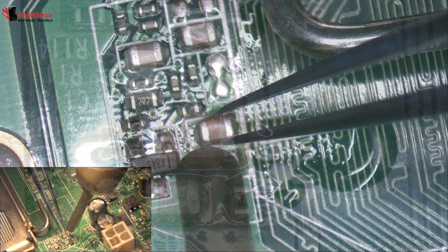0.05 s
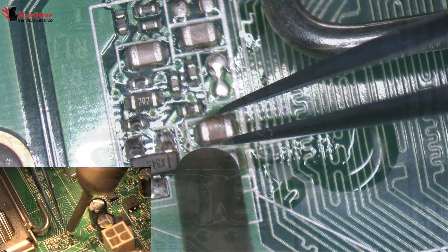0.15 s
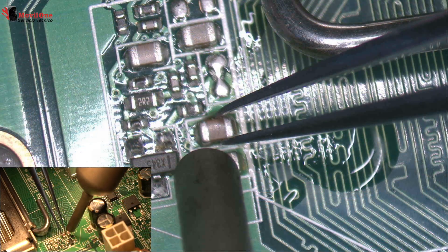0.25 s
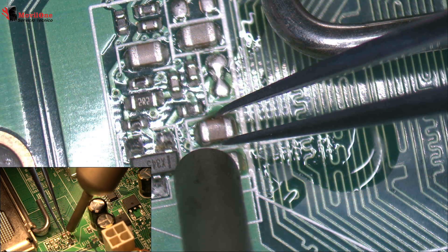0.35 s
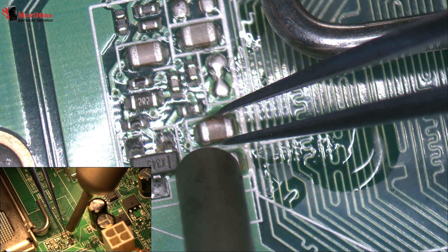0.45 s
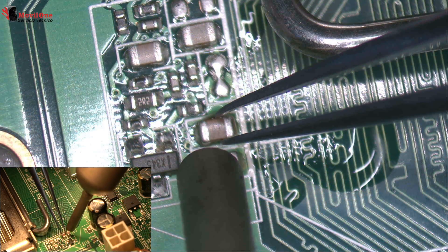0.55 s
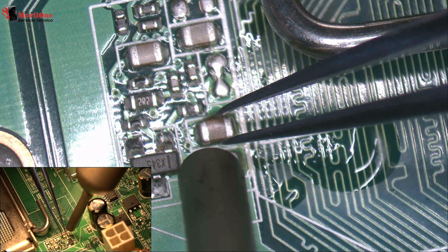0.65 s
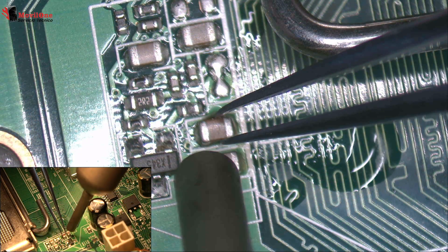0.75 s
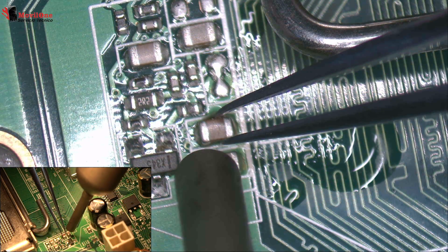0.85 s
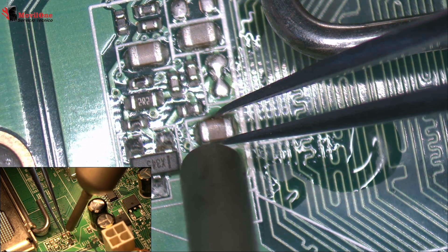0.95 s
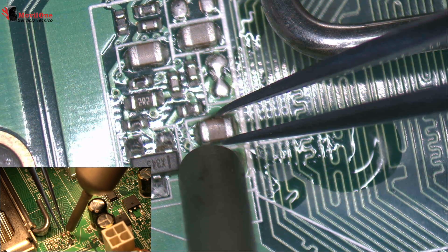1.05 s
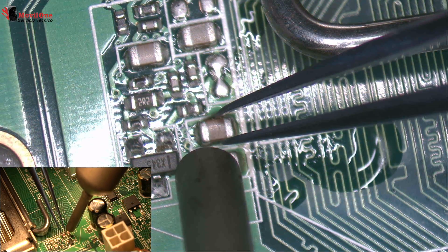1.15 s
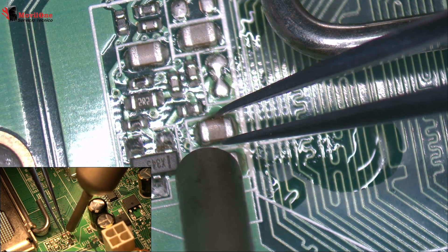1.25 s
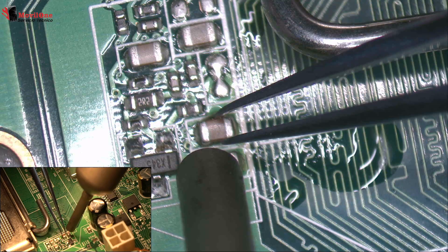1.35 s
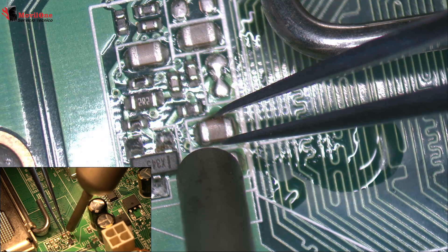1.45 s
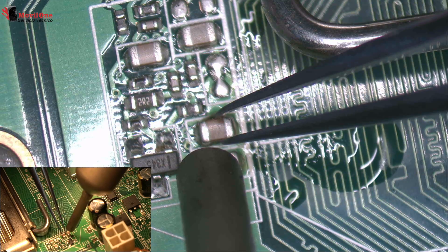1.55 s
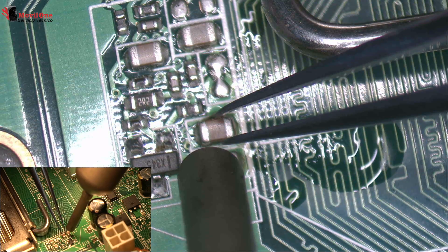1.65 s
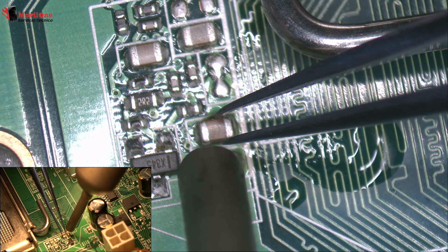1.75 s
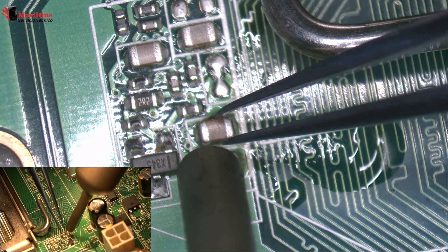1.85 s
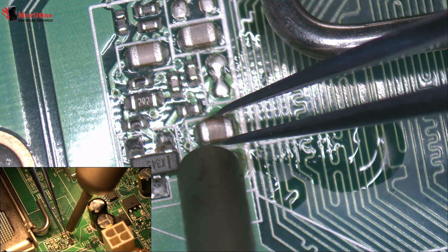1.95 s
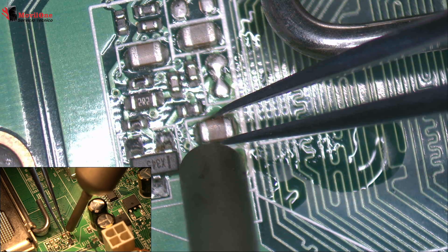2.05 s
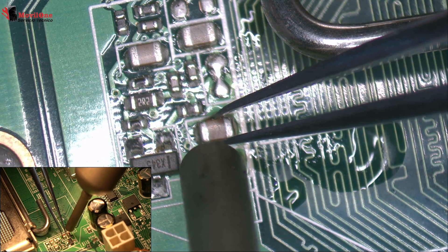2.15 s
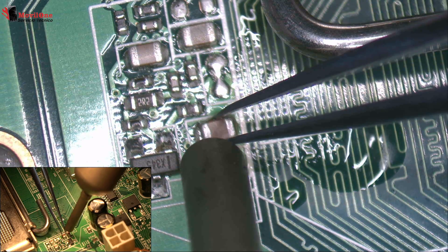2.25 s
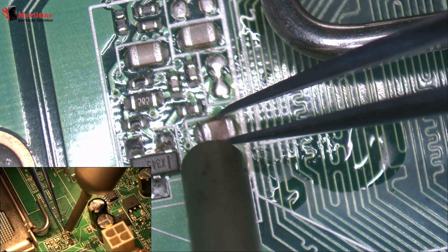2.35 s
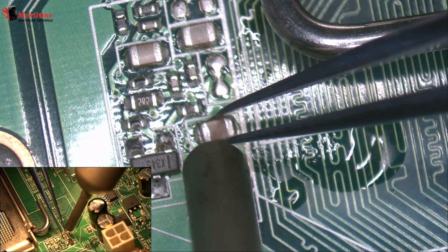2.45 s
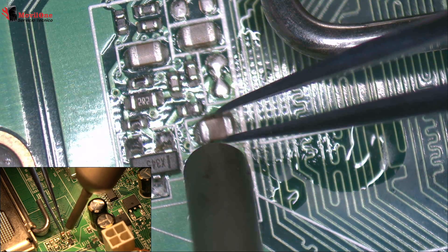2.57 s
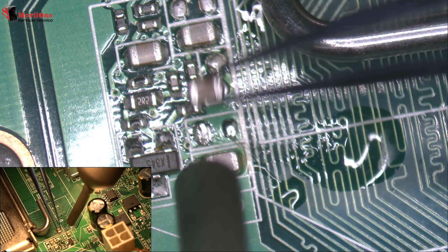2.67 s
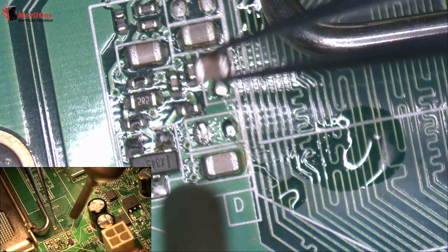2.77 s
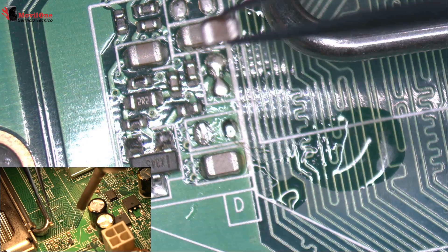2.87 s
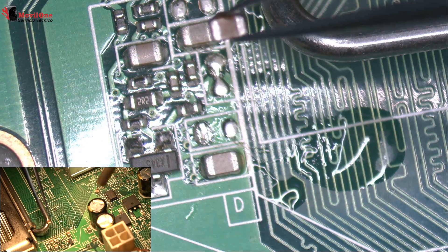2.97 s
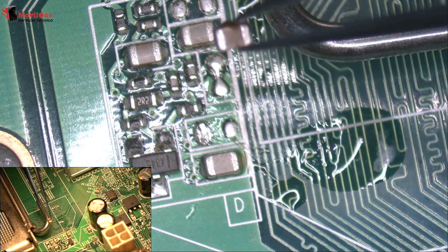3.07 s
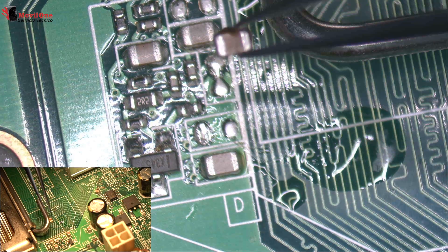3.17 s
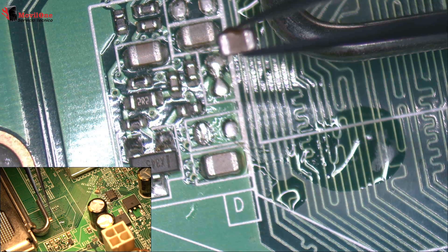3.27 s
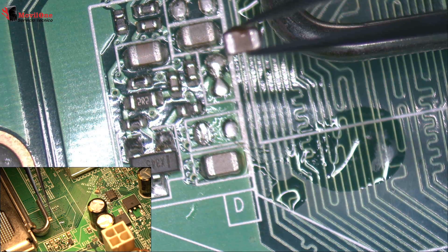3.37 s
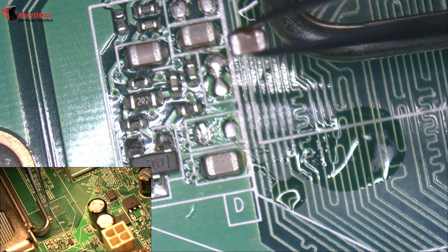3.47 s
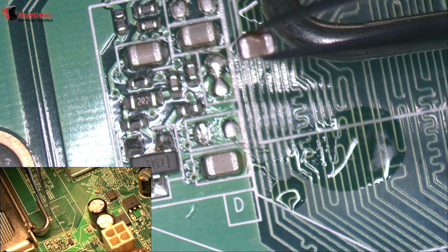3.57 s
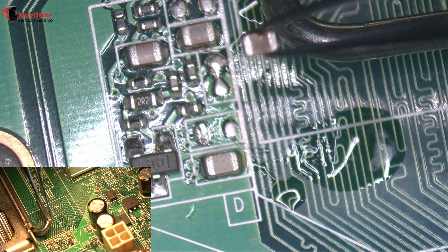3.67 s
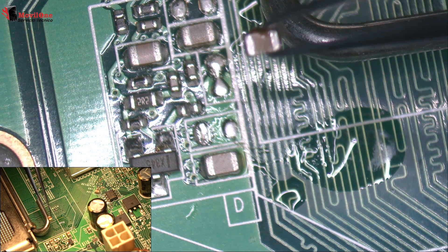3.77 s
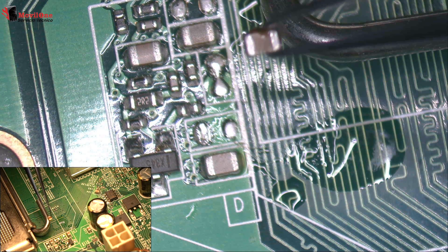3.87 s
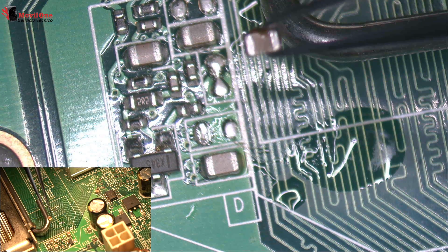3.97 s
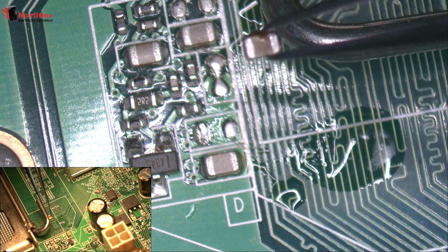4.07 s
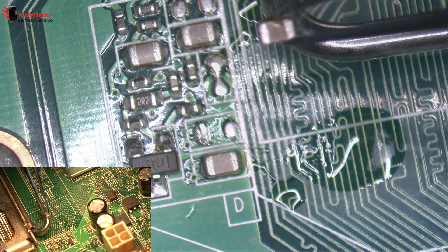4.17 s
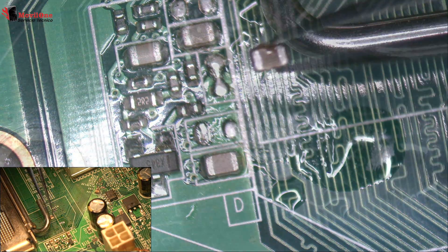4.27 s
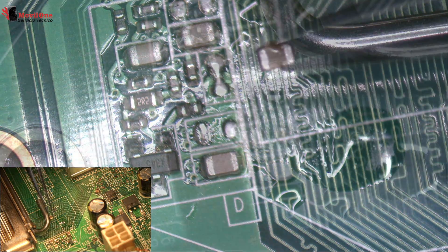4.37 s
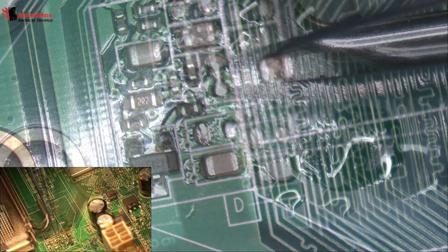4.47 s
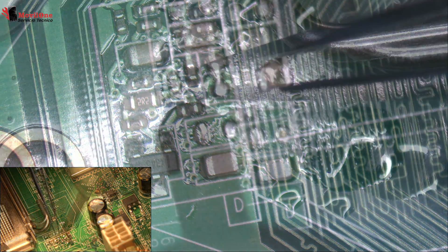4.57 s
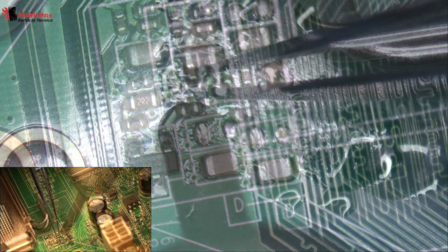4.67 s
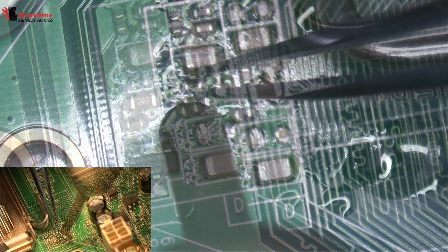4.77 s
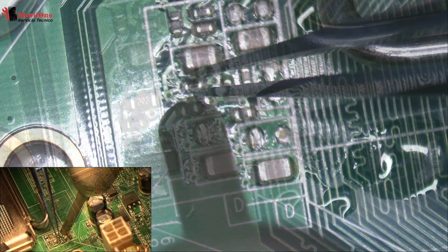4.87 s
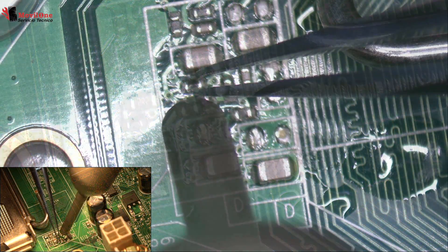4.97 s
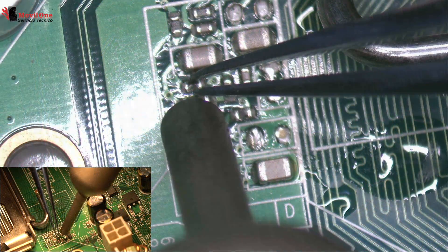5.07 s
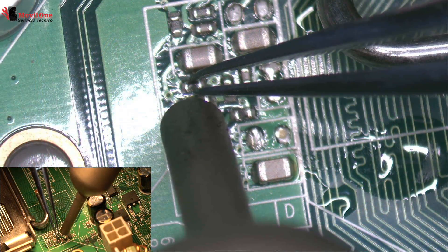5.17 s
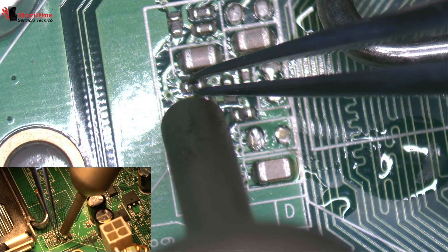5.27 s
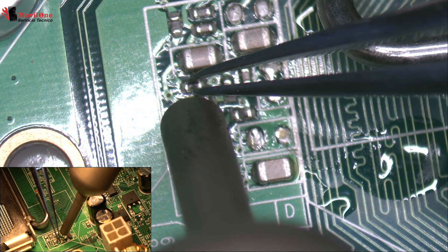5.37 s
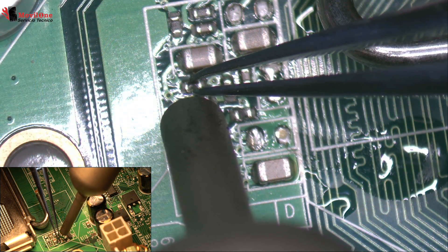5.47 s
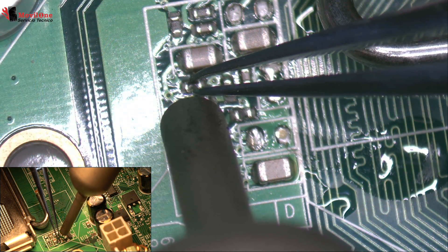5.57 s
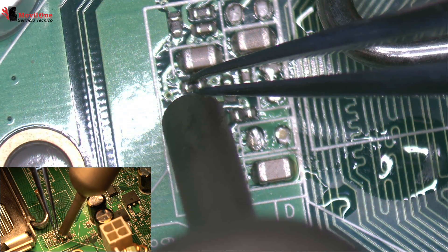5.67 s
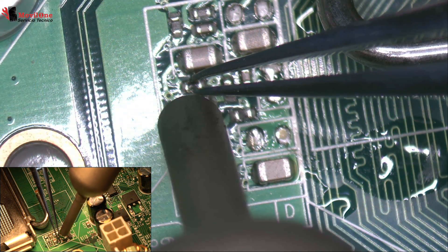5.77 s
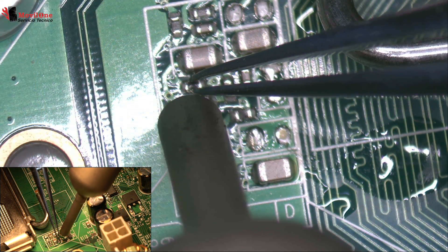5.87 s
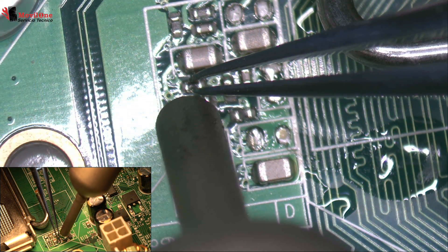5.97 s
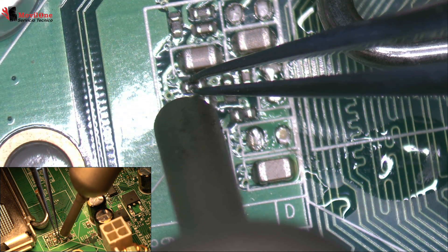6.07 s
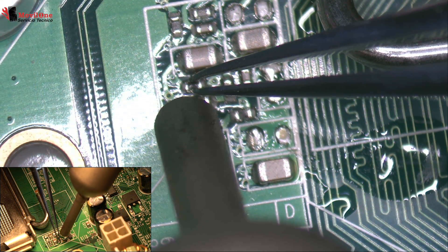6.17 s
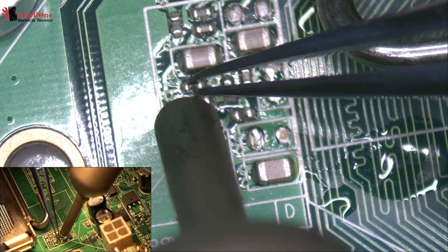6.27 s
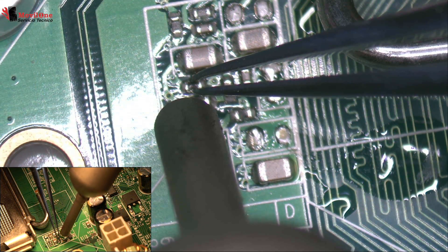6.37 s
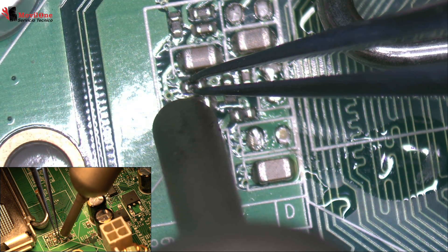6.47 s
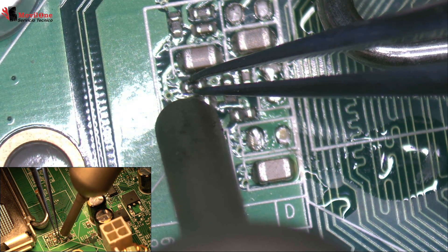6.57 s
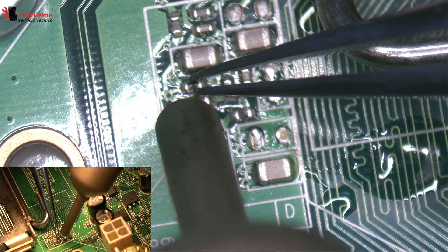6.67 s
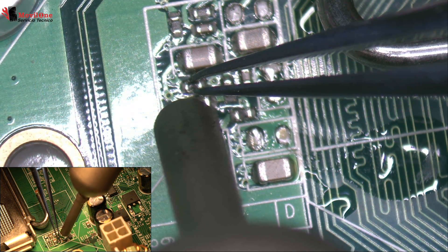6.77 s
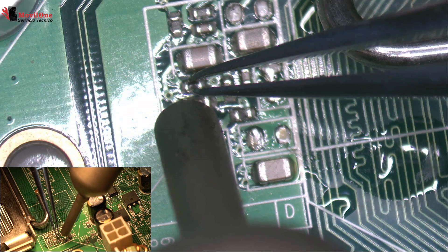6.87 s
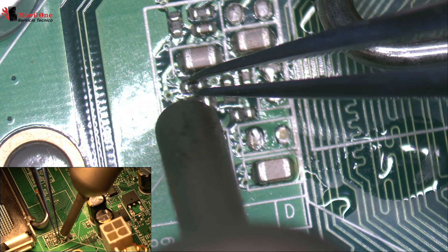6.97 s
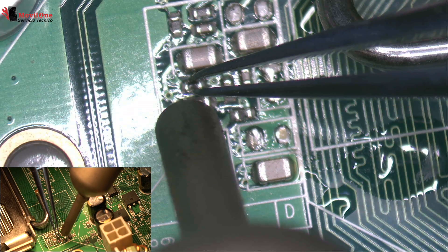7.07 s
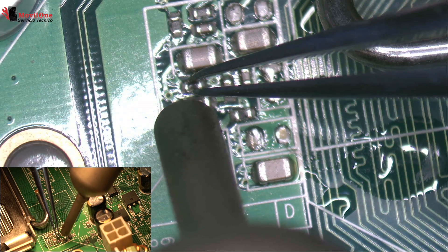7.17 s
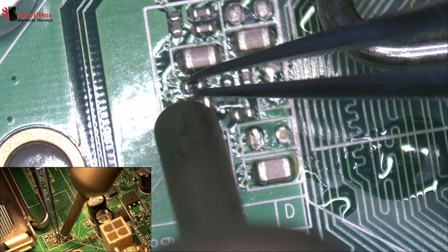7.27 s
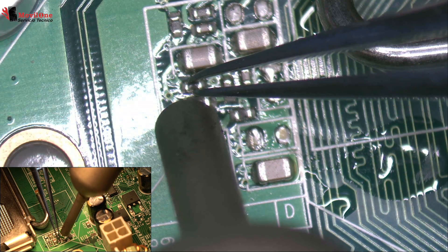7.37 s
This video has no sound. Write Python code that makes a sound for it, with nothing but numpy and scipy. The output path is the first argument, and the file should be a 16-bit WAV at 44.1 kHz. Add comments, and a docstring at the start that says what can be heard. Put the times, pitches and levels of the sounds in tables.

```python
"""A hot air tool hisses on a circuit board, coloured by the resonances of handle and nozzle, over room
rumble, a bench fan humming on the left and the faint whine of the tool's blower. A low drone fades and
is gone by 2.1 s. From 2.3 s the jet tips, whooshes across a hollow edge, lifts off and swings aside with
a falling swish. By 5 s it is back on the board at a second spot while the fan's hum thins. Around 5.5 s
the level dips twice and the hum returns; the jet blows on to the end."""
import sys
import numpy as np
from scipy import signal
from scipy.fft import rfft, irfft, next_fast_len
from scipy.io import wavfile
from scipy.ndimage import uniform_filter1d, map_coordinates

SR = 44100
rng = np.random.default_rng(int(sys.argv[2]) if len(sys.argv) > 2 else 0)


def generate_wav(sig):
    """Save sig (samples, or channels by samples) to the path in sys.argv[1] as 16-bit PCM at SR."""
    pcm = np.round(np.clip(np.atleast_2d(sig).T, -1, 1) * 32767).astype(np.int16)
    wavfile.write(sys.argv[1], SR, pcm)


N = 327222
TIME = np.arange(N) / SR


def amp(db):
    """Gain of a level in dB."""
    return 10 ** (np.asarray(db) / 20)


def unit(x):
    """Normalise to rms 1."""
    return x / np.sqrt(np.mean(x ** 2) + 1e-20)


def curve(points, hz):
    """EQ curve through breakpoints on a log frequency axis."""
    freqs, levels = np.transpose(points)
    return np.interp(np.log(hz + 1), np.log(freqs + 1), levels)


def bell(hz, centre_hz, width_hz):
    """Resonance shape, 1 at the centre."""
    return 1 / (1 + (2 * (hz - centre_hz) / width_hz) ** 2)


def eq(x, response):
    """Filter x by a gain that depends on frequency."""
    size = next_fast_len(N + 8192)
    return irfft(rfft(x, size) * response(np.fft.rfftfreq(size, 1 / SR)), size)[..., :N]


def wobble(rate):
    """Smooth random LFO, rate knots a second."""
    return map_coordinates(rng.standard_normal(int(N * rate / SR) + 4), [TIME * rate])


def swell(start, attack, hold, release):
    """Envelope from 0 to 1 and back; times in seconds."""
    return np.interp(TIME, np.cumsum([start, attack, hold, release]), [0, 1, 1, 0])


def sine(hz, phase=0):
    """Oscillator of rms 1 on a pitch curve."""
    return np.sqrt(2) * np.sin(2 * np.pi * np.cumsum(hz) / SR + phase)


def stereo(mid, side):
    """Mid/side to left/right."""
    return np.array([mid + side, mid - side])


def turbulence(shape, bins, frames):
    """Random patches over frequency and time, rms 1."""
    field = uniform_filter1d(rng.standard_normal(shape), size=bins, axis=0)
    return unit(uniform_filter1d(field, size=frames, axis=1))


def air_noise(colour_db, patchy_db, side_db):
    """Coloured stereo noise made patchy by turbulence; the mid has rms 1."""
    spectra = signal.stft(rng.standard_normal((2, N)), nperseg=512)[2]
    spectra *= amp(patchy_db * turbulence(spectra.shape[1:], bins=8, frames=12))
    pair = signal.istft(spectra, nperseg=512)[1][:, :N]
    mid, side = eq(pair, lambda hz: amp([colour_db(hz), colour_db(hz) + side_db(hz)]))
    return stereo(mid, side) / np.sqrt(np.mean(mid ** 2))


# The tool's moves; rows are first spot, tipping, lifting, aloft, aside, second spot:
# (arrival [s], departure [s], jet level on arrival [dB], jet level on departure [dB])
POSES = [(0, 2.3, -29, -29.5), (2.45, 2.55, -30, -30.4), (2.7, 2.86, -35, -36), (3.5, 3.72, -36, -34.5),
         (3.83, 4.5, -36, -37.5), (4.95, 6.5, -30.5, -30)]
POSE_TIMES = np.ravel([row[:2] for row in POSES])


def pose_mix(t):
    """Crossfade weights at times t as the tool glides between poses, one row a pose."""
    index = np.arange(len(POSES))
    position = np.interp(t, POSE_TIMES, np.repeat(index, 2))
    return np.clip(1 - abs(position - index[:, None]), 0, 1)


# EQ of the room's rumble and of the fan's rush: (frequency [Hz], gain [dB])
RUMBLE_EQ = [(15, -28), (25, -6), (45, 3.5), (62, 2), (100, 0.5), (130, -7.5), (200, -39)]
RUSH_EQ = [(60, -28), (95, -8.5), (140, -5.5), (190, -4.5), (250, 2), (300, -1), (400, -3), (480, 0),
           (600, -8), (1000, -9), (2500, -47.5)]
# Stereo width of the room, shared by the jet: (frequency [Hz], side over mid [dB])
ROOM_WIDTH = [(60, -17), (110, -16), (200, -10), (480, -10), (800, -11), (1300, -16), (2200, -23),
              (3500, -36), (15000, -37)]
# Balance of the room tone: (frequency [Hz], left over right [dB])
ROOM_BALANCE = [(110, 0.5), (200, 1.5), (380, 9.5), (700, 4), (1300, 2)]


def room_tone():
    """Lumpy rumble and fan rush, leaning left; the rumble eases as the tool reaches the second spot."""
    width = lambda hz: curve(ROOM_WIDTH, hz)
    second_spot = pose_mix(TIME)[-1]
    rumble_db = -56.5 - 4.5 * second_spot + 2.5 * wobble(7)
    rush_db = -45.5 + second_spot
    rumble = amp(rumble_db) * air_noise(lambda hz: curve(RUMBLE_EQ, hz), patchy_db=0.71, side_db=width)
    rush = amp(rush_db) * air_noise(lambda hz: curve(RUSH_EQ, hz), patchy_db=0.87, side_db=width)
    return eq(rumble + rush, lambda hz: amp(np.outer([.5, -.5], curve(ROOM_BALANCE, hz))))


# Dropouts in the drone: (time [s], half width [s])
DRONE_GAPS = [(.23, 0.11), (1.01, .13), (1.51, 0.12)]


def drone(pitch_hz=97.7, settle_s=.6, end_s=2.08):
    """A low tone that fades, drops out now and then, and stops; it arrives slightly earlier on the left."""
    hz = pitch_hz + 0.74 * wobble(6)
    level_db = -51.5 + 8 * np.exp(-TIME / settle_s) + 1.9 * wobble(6.9)
    gain = amp(level_db) * np.clip((end_s - TIME) / 0.08, 0, 1)
    for at_s, half_s in DRONE_GAPS:
        gain *= np.clip(abs(TIME - at_s) / half_s, 0, 1)
    return gain * [sine(hz, phase=0.11), sine(hz, phase=-0.11)]


# Partials of the blower motor: (pitch ratio, gain [dB])
WHINE_PARTIALS = [(1, 0), (.9916, -4), (.9598, -8), (1.5005, -5)]


def blower_whine(pitch_hz=4236, recover_s=1.5):
    """Thin motor tones come and go; the pitch sags and creeps back at the start and at the second spot."""
    hz = pitch_hz
    for at_s, sag_hz in (0, 12), (4.9, 18):
        hz = hz - sag_hz * (TIME >= at_s) * np.exp(-abs(TIME - at_s) / recover_s)
    off_board = pose_mix(TIME)[2:5].sum(axis=0)
    level_db = -56.5 + 2 * off_board
    return sum(amp(level_db + db + 3.1 * wobble(3.13)) * sine(ratio * hz + 1.2 * wobble(8))
               for ratio, db in WHINE_PARTIALS)


# Faint tones beside the fan's hum: (pitch [Hz], left level [dB], right level [dB], waver [dB])
FAN_TONES = [(366.4, -49, -56, 1.5), (693.6, -61, -65, 2.5)]


def bench_fan(pitch_hz=346.8, left_db=-33, right_db=-40, lead_rad=0.41):
    """A steady hum, louder and earlier on the left, with fainter wavering tones beside it."""
    hz = pitch_hz + .25 * wobble(2)
    hum = amp([[left_db], [right_db]]) * [sine(hz, lead_rad / 2), sine(hz, -lead_rad / 2)]
    # A centred, nearly antiphase copy swells, partly cancels the hum and stops short.
    cancel_s = (4.33, .9, .295, .012)
    hum *= amp(0.96 * (TIME > sum(cancel_s)))  # a little louder afterwards
    hum += amp(-36) * swell(*cancel_s) * sine(hz, phase=2.76)
    for tone_hz, tone_left_db, tone_right_db, waver_db in FAN_TONES:
        gain = amp([[tone_left_db], [tone_right_db]]) * amp(waver_db * wobble(4))
        hum += gain * sine(tone_hz + 0.26 * wobble(1.84))
    return hum


def nozzle_swish(start_s=3.3, from_hz=12200, fall_hz_per_s=11800, width_hz=1400):
    """A band of hiss slides down as the nozzle swings past the listener."""
    hz, t, spectra = signal.stft(rng.standard_normal(N), SR, nperseg=512)
    centre_hz = np.clip(from_hz - fall_hz_per_s * (t - start_s), width_hz, from_hz)
    spectra *= bell(hz[:, None], centre_hz, width_hz)
    hiss = unit(signal.istft(spectra, nperseg=512)[1][:N])
    return amp(-50.5) * swell(start_s, attack=.15, hold=.29, release=.15) * hiss


# Resonances of the hollow edge: (centre [Hz], width [Hz], gain [dB])
EDGE_RESONANCES = [(1200, 420, 0.12), (1700, 430, -1)]


def edge_whoosh():
    """A short whoosh as the jet excites a hollow edge."""
    def colour_db(hz):
        power = sum((amp(db) * bell(hz, centre, width)) ** 2 for centre, width, db in EDGE_RESONANCES)
        return 10 * np.log10(power)

    whoosh = air_noise(colour_db, patchy_db=1.9, side_db=lambda hz: -18)
    return amp(-40.5) * swell(start=2.48, attack=0.18, hold=0.24, release=0.22) * whoosh


# Broad EQ of the jet on the board: (frequency [Hz], gain [dB])
FIRST_SPOT_EQ = [(290, -22), (500, -4.5), (1610, -6.5), (2370, -5.5), (3930, -3.5), (4410, -6),
                 (7630, -2.5), (11500, -7), (15700, -13)]
SECOND_SPOT_EQ = [(290, -42), (500, -5.5), (1730, -5), (3880, -6), (4410, -11), (5100, -6), (7740, -6.5),
                  (11500, -9), (15700, -17.5)]
# Peaks and notches of nozzle and board:
# (centre [Hz], width [Hz], gain at first spot [dB], gain at second spot [dB])
NOZZLE_BELLS = [(910, 330, 2.5, 1), (1695, 420, 4.5, 5), (2190, 140, 5, 3), (2316, 86, -8, -3.5),
                (2890, 510, 4, 2.5), (4025, 570, 7, 4), (4290, 480, -6.5, -2), (5114, 160, 7.5, 4),
                (5880, 120, 6, 6), (7010, 150, 4, 4.5), (7155, 160, -12, -16), (7630, 780, 3.5, 4.5),
                (8340, 210, -7, -8), (9400, 540, 4.5, 3.5), (9900, 446, -0.5, -3.5), (10580, 670, 2.5, 3.5),
                (12950, 400, 2.5, 1), (13600, 400, 4.5, 5), (14200, 450, -3, -6), (15200, 500, 2, 5)]
# As the nozzle tips, two resonances swell and the treble turns away: (centre [Hz], width [Hz], gain [dB])
TIPPING_BELLS = [(3100, 400, 4), (5850, 600, 4), (7000, 500, -2), (11000, 6000, -2), (14600, 600, -8)]
# EQ of the jet in its three poses off the board: (frequency [Hz], gain [dB])
LIFTING_EQ = [(300, -20), (700, -2), (2250, -2), (2750, 0), (4250, -2), (4700, -10), (5900, 0), (7300, -5),
              (7800, -3), (8300, -8), (9300, -4), (11000, -6), (14200, -14), (15700, -16)]
ALOFT_EQ = [(300, -20), (700, -5), (2000, -2), (3000, -.5), (4200, 0), (4750, -2.5), (6000, -.5),
            (8000, -1.5), (11000, -2), (13000, -7), (15700, -9)]
ASIDE_EQ = [(300, -20), (700, -6), (1500, -2), (2100, -5), (2800, 0), (3600, -3), (4300, -1), (5200, -.5),
            (6500, -3.5), (8200, 0), (10000, -4.5), (11500, -4), (13000, -8), (15700, -10)]


def air_jet(widen_db=30, widen_above_hz=5200):
    """One hiss that morphs from pose to pose; on the board, nozzle and reflections comb it."""
    hz, t, spectra = signal.stft(rng.standard_normal((2, N)), SR, nperseg=1024)
    first, second = curve(FIRST_SPOT_EQ, hz), curve(SECOND_SPOT_EQ, hz)
    for centre, width, first_db, second_db in NOZZLE_BELLS:
        first += first_db * bell(hz, centre, width)
        second += second_db * bell(hz, centre, width)
    tipped = first + sum(db * bell(hz, centre, width) for centre, width, db in TIPPING_BELLS)
    colours = [first, tipped, curve(LIFTING_EQ, hz), curve(ALOFT_EQ, hz), curve(ASIDE_EQ, hz), second]
    powers = np.transpose([unit(amp(colour)) ** 2 for colour in colours])
    mix = pose_mix(t)
    spectra *= np.sqrt(powers @ mix)  # equal-power crossfade
    spectra *= amp(0.56 * turbulence(spectra.shape[1:], bins=14, frames=5))
    # Pointed aside at the walls, the jet's treble comes back wide.
    aside = mix[4]
    treble = 1 / (1 + (widen_above_hz / (hz + 1)) ** 8)
    spectra[1] *= amp(curve(ROOM_WIDTH, hz)[:, None] + widen_db * np.outer(treble, aside))
    mid, side = signal.istft(spectra, nperseg=1024)[1][:, :N]
    level_db = np.interp(TIME, POSE_TIMES, np.ravel([row[2:] for row in POSES]))
    flutter_db = 0.22 * wobble(5.1) + 0.18 * wobble(11)
    return amp(level_db + flutter_db) * stereo(mid, side)


def scene():
    """The jet and its moves over fan, blower, drone and room tone."""
    return air_jet() + edge_whoosh() + nozzle_swish() + bench_fan() + blower_whine() + drone() + room_tone()


# Brief dips of the whole mix: (time [s], half width [s], gain [dB])
LEVEL_DIPS = [(5.452, 0.011, -4), (5.528, 0.0053, -3.5)]


def record(dry, rise_s=0.15, top_hz=15740):
    """Master bus: a quick rise to full level, two brief dips and a brick-wall high cut."""
    rise_db = -3 * np.exp(-TIME / rise_s)
    dips_db = sum(db * np.exp(-((TIME - at_s) / half_s) ** 2) for at_s, half_s, db in LEVEL_DIPS)
    return eq(dry * amp(rise_db + dips_db), lambda hz: hz < top_hz)


dry = scene()
out = record(dry)
generate_wav(out)
```